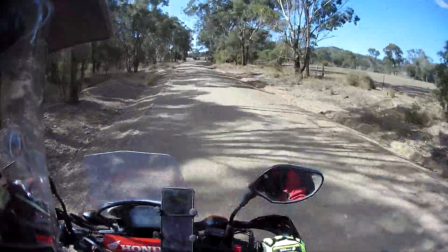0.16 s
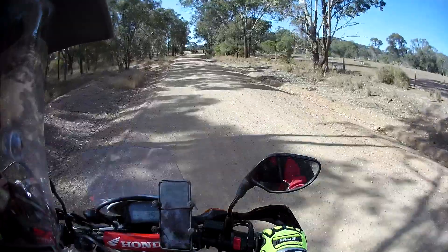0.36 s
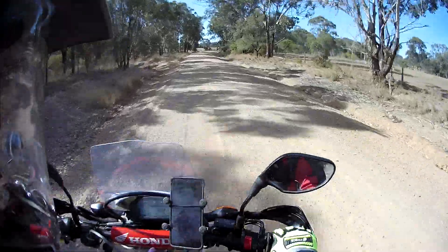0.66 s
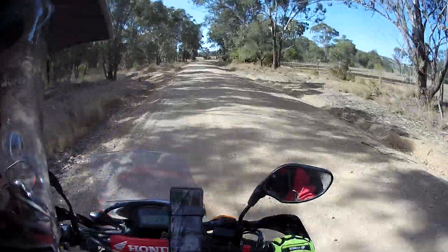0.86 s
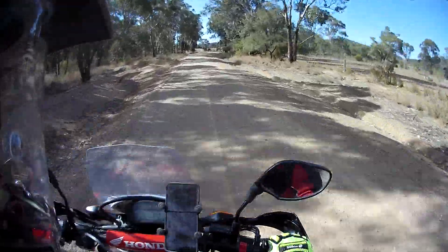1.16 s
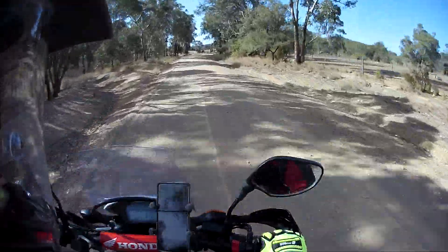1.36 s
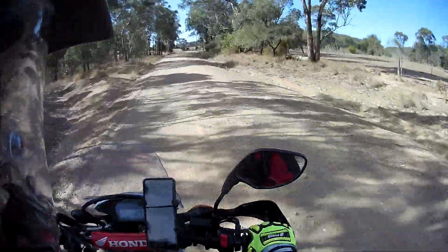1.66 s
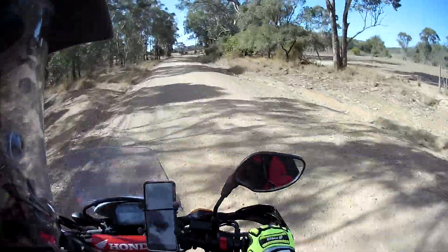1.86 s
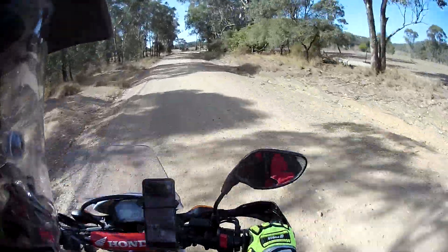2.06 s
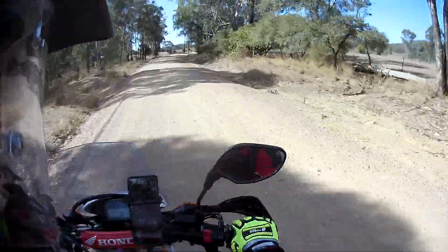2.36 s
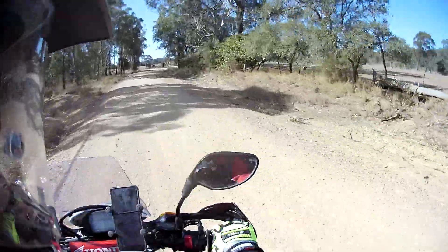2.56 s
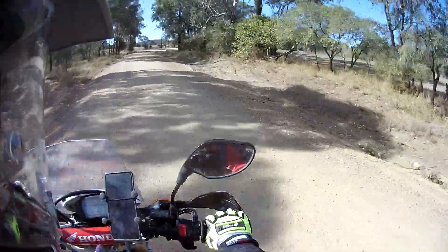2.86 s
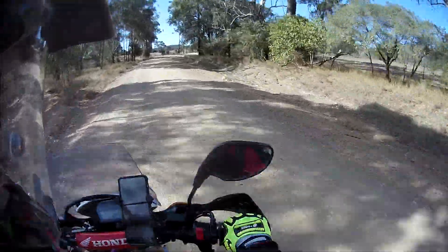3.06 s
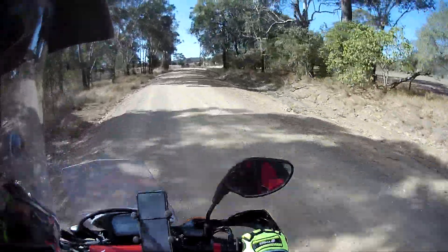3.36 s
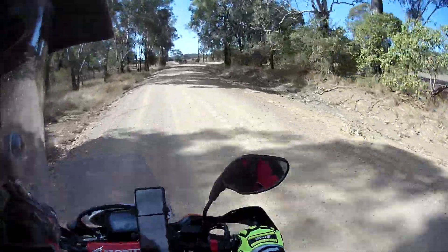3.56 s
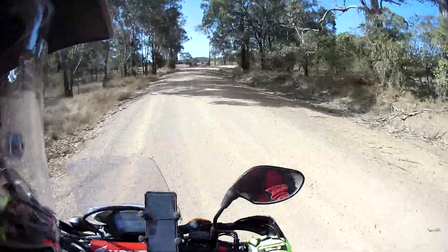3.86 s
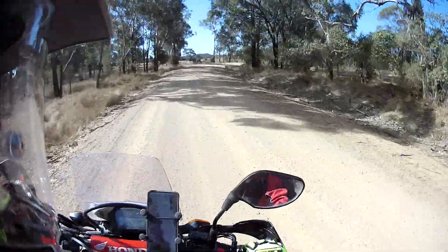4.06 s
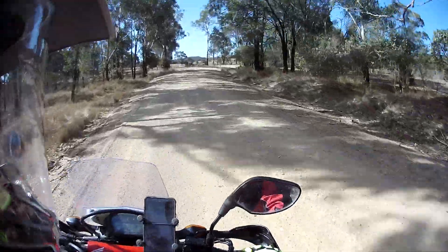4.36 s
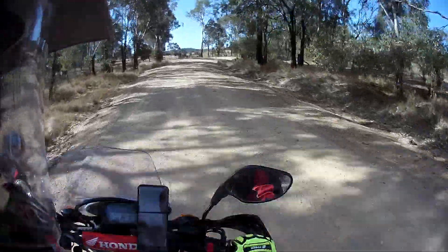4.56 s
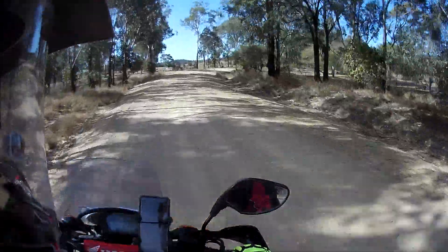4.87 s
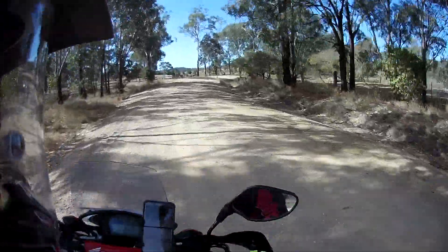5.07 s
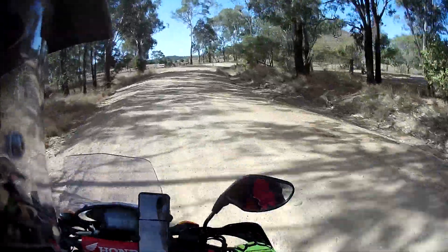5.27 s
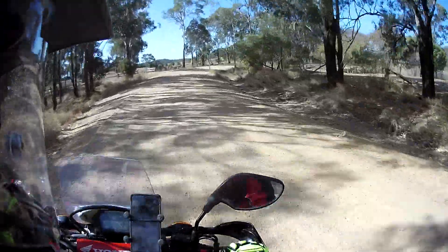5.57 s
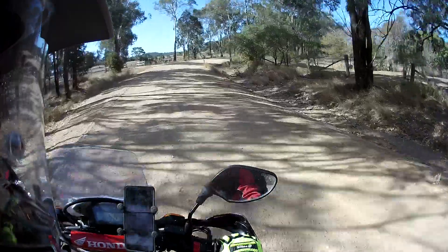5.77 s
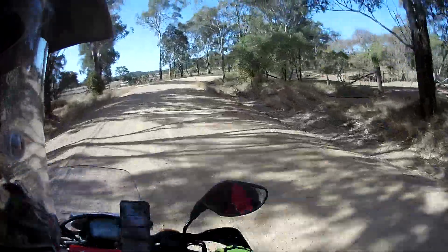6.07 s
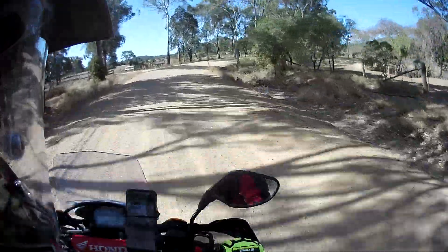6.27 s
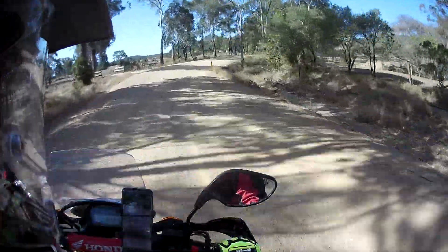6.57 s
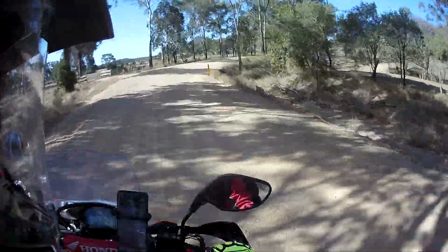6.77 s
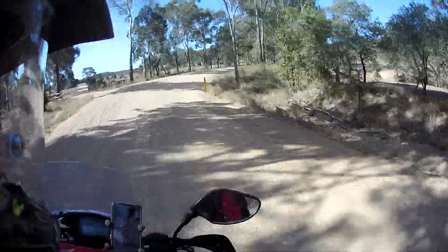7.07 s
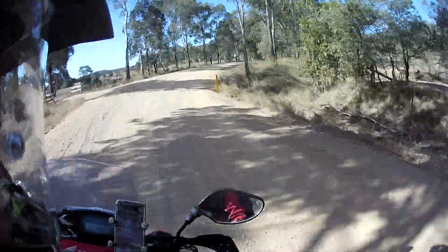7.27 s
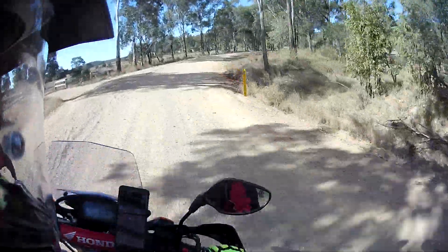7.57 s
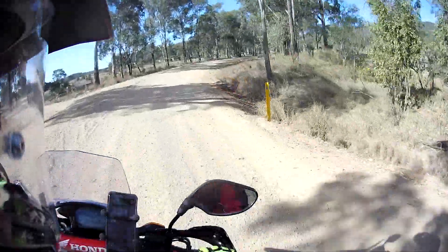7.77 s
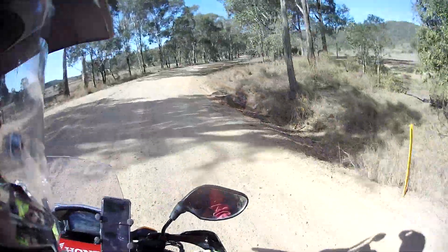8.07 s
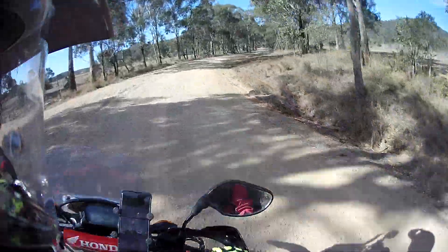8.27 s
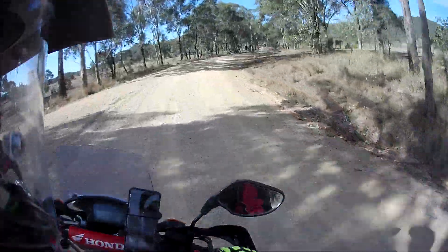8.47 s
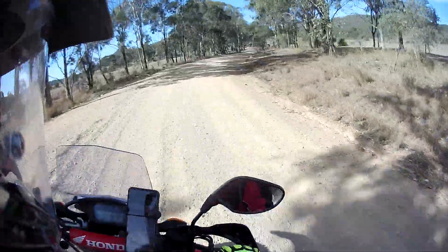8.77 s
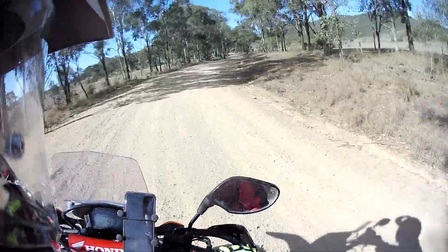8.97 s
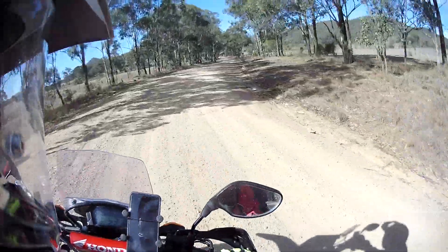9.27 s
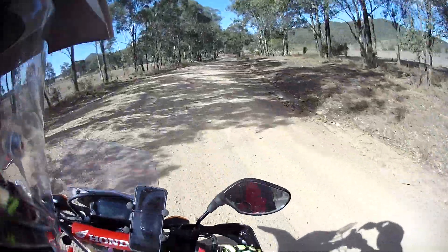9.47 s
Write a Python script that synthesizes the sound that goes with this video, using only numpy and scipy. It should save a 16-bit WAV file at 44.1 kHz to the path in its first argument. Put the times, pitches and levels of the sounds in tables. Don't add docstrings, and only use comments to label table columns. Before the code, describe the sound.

Close helmet microphone on a single-cylinder motorcycle riding an open gravel road. A low, pulsing exhaust throb and humming frame mix with lumpy wind buffeting, tyre roar and fine grit clicks. Deep jolts thump the microphone in the first second or so, then the engine gradually slows with brief throttle dabs. A small stone ticks sharply near six seconds, and the engine finally pulls steadily at a lower pitch.

```python
import sys
import numpy as np
from scipy import signal
from scipy.io import wavfile
from scipy.ndimage import uniform_filter1d

SR = 44100
rng = np.random.default_rng(int(sys.argv[2]) if len(sys.argv) > 2 else 0)


def waveform_to_disk(signal):
    frames = np.transpose(np.atleast_2d(signal))
    scaled = np.clip(frames, -1, 1) * 32767
    samples = np.round(scaled).astype(np.int16)
    wavfile.write(sys.argv[1], SR, samples)


def undo_db(level):
    steps = np.asarray(level, float) / 20
    return 10 ** steps


N = 425124


def evened(x):
    return x / np.sqrt(np.mean(x ** 2) + 1e-20)


def steady(x, size=4000):
    power = uniform_filter1d(uniform_filter1d(x ** 2, size), size)
    return x / np.sqrt(abs(power) + 1e-20)


def soften(x, hz):
    r = np.exp(-2 * np.pi * hz / SR)
    return signal.lfilter([1 - r], [1, -r], x)


def resonate(x, hz, width):
    r = np.exp(-np.pi * width / SR)
    if np.ndim(hz) == 0:
        return 2 * signal.lfilter([1 - r], [1, -r * np.exp(2j * np.pi * hz / SR)], x).real
    turn = np.exp(2j * np.pi * np.cumsum(hz) / SR)
    smooth = signal.lfilter([1 - r], [1, -r], x / turn + 1e-18)
    return 2 * (turn * smooth).real


def noise(spectrum, patchy_db, flicker_db, size=1024):
    frames, hz = 4 * N // size + 5, np.fft.rfftfreq(size, 1 / SR)
    a, b, patches = rng.standard_normal((frames, len(hz), 3)).T
    patches = uniform_filter1d(patches, size=size // 100, axis=0)
    patches = evened(uniform_filter1d(patches, size=6, axis=1))
    flicker = evened(uniform_filter1d(rng.standard_normal(frames), size=3))
    f, db = np.transpose(spectrum)
    shape_db = np.interp(np.log(hz + 1), np.log(f + 1), db, -120, -120)[:, None]
    z = (a + 1j * b) * undo_db(shape_db + patchy_db * patches + flicker_db * flicker)
    return evened(signal.istft(z, nperseg=size, noverlap=size * 3 // 4)[1][:N])


def curves(rows):
    s, *columns = np.transpose(rows)
    return [np.interp(np.arange(N) / SR, s, c) for c in columns]


# (time [s], rate [firings per s])
ENGINE_SPEED = [(0.0, 42.373), (0.41, 43.529), (1.25, 41.024), (2.15, 39.077), (2.3, 40.293), (2.5, 39.133),
                (3.68, 37.491), (3.84, 35.443), (4.0, 35.985), (4.8, 35.657), (5.05, 34.261), (5.7, 32.979),
                (5.88, 34.112), (6.25, 31.031), (6.9, 31.329), (7.5, 30.915), (8.6, 30.977), (9.64, 31.518)]


def firing_rate():
    return curves(ENGINE_SPEED)[0]


def over_cruise():
    return firing_rate() - 36


def crank():
    return .91 + np.cumsum(firing_rate()) / SR


# (time [s], throttle [0-1], pipe ring level [dB], pipe pitch [Hz])
THROTTLE_AND_PIPE = [(0, 0.3, -32.5, 259), (.45, 0.4, -35.5, 253.7), (1.5, 0.3, -35.5, 221),
                     (2.12, 0, -46.5, 232.7), (2.32, .7, -34.5, 257.4), (2.6, 0, -33, 224.4),
                     (3.62, .6, -36, 220.3), (3.85, 0.1, -35.5, 215), (4.1, .15, -35.5, 213.4),
                     (4.55, .05, -45, 213.5), (4.8, .5, -38.5, 278), (5.1, 0.4, -42.5, 204.7),
                     (5.65, 0, -51, 200), (5.9, .5, -34, 240.3), (6.2, 0.1, -43.5, 190),
                     (7, .05, -41.5, 198.6), (7.3, 0.63, -36, 270.2), (9.64, 0.96, -34, 269.4)]


def throttle_and_pipe():
    return curves(THROTTLE_AND_PIPE)


def between(ends):
    shut, wide_open = ends
    return shut + (wide_open - shut) * np.clip(throttle_and_pipe()[0], 0, 1)


def gas_pulses(turns):
    rough = between((.3, .06))
    early = turns + 0.2207
    whole = np.arange(np.ceil(early[0]), early[-1])
    size, lag = rng.standard_normal((len(whole), 2)).T
    at = np.searchsorted(early, whole)
    late = (.0012 * SR * rough[at] * lag).astype(int)
    pulses = np.zeros(N)
    pulses[np.clip(at + late, 0, N - 1)] = undo_db(8.4 * rough[at] * size)
    pulses = evened(soften(soften(pulses, 630), 630))
    puff = soften(rng.standard_normal(N), 800) * (.15 + np.exp(-(early % 1) / 0.14))
    return pulses + 0.36 * rough * evened(puff)


def pipe_ring(drive):
    _, ring_db, pipe_hz = throttle_and_pipe()
    narrow = np.clip((110 - between((74, 21))) / 70, 0, 1)
    wide = resonate(resonate(drive, pipe_hz, 180), pipe_hz, 140)
    long_ring = evened(resonate(wide, pipe_hz, 46))
    short_ring = evened(resonate(wide, pipe_hz, 160))
    return undo_db(ring_db) * steady(narrow * long_ring + (1 - narrow) * short_ring)


def silencer_thump(drive):
    hz = between((3.05, 4.4)) * firing_rate()
    db = between((-42, -47)) + 0.03 * over_cruise()
    return undo_db(db) * steady(resonate(resonate(drive, hz, 150), hz, 62))


# (pitch [Hz], width [Hz], level [dB])
AIR_BOX = [(576, 60, 5), (523, 80, 1.5), (710, 200, -3.5), (190, 67, 1)]


def air_box_knock(drive):
    late = np.roll(drive, round(.00182 * SR))
    knock = np.zeros(N)
    for hz, width, db in AIR_BOX:
        push = late if hz > 400 else drive
        knock += undo_db(db) * resonate(resonate(push, hz, min(4 * width, 500)), hz, width)
    return undo_db(between((-65.5, -45)) + 6) * steady(knock)


def exhaust(turns):
    drive = gas_pulses(turns)
    return silencer_thump(drive) + air_box_knock(drive) - pipe_ring(drive)


def loaded(rows):
    t, db = np.arange(N) / SR, np.full(N, -78.0)
    for row in rows:
        db[(t >= row[0]) & (t <= row[1])] = row[-1]
    return uniform_filter1d(db, round(.12 * SR))


def hum(firing, order):
    hz = order * firing_rate()
    return steady(resonate(resonate(firing, hz, 9), hz, 9))


# (start [s], end [s], level [dB])
LOW_HUM = [
    (0, 2.22, -38),
    (3.75, 4.3, -42),
    (5.15, 5.8, -38),
    (6.22, 6.75, -42),
]


def low_frame_hum(firing):
    return undo_db(loaded(LOW_HUM) - 5.5) * hum(firing, 3)


# (start [s], end [s], level [dB])
HIGH_HUM = [
    (0, 4.5, -53.5),
    (2.28, 2.6, -46.5),
    (3.9, 4.5, -38.5),
    (4.7, 6.1, -42),
    (6.25, 6.95, -49),
]


def high_frame_hum(firing):
    return undo_db(loaded(HIGH_HUM) - 10) * hum(firing, 6)


def meshing(rows):
    rows = np.array(rows)
    hz = np.interp(np.arange(N) / SR, rows[:, :2].ravel(), rows[:, 2:4].ravel())
    return hz, loaded(rows)


# (start [s], end [s], first pitch [Hz], last pitch [Hz], level [dB])
COAST_WHINE = [
    (0, .6, 2080, 2030, -57),
    (1.45, 2.2, 2120, 1980, -59.5),
    (2.3, 2.8, 2035, 2033, -57.5),
    (2.85, 3.7, 1914, 1903, -60.5),
    (3.9, 4.7, 1910, 1816, -58.5),
    (5.12, 6.08, 1784, 1698, -60),
    (6.2, 6.42, 1690, 1685, -61),
    (7.5, 9.64, 1642, 1678, -63),
]


def coasting_whine():
    hz, db = meshing(COAST_WHINE)
    whine = resonate(resonate(rng.standard_normal(N), hz, 80), hz, 30)
    return undo_db(db - 2.3) * steady(whine, size=6000)


# (start [s], end [s], first pitch [Hz], last pitch [Hz], level [dB])
PULL_WHINE = [
    (0, 1.5, 1456, 1490, -61.5),
    (2.3, 3.65, 1487, 1446, -59),
    (7.3, 9.64, 1500, 1514, -60.5),
]


def pulling_whine():
    hz, db = meshing(PULL_WHINE)
    return undo_db(db) * evened(resonate(resonate(rng.standard_normal(N), hz, 150), hz, 95))


# (start [s], end [s], level [dB])
SHAFT_TONE = [
    (0, .6, -61),
    (2.4, 3.78, -52),
]


def shaft_tone(turns):
    return undo_db(loaded(SHAFT_TONE)) * np.sqrt(2) * np.sin(2 * np.pi * 15 * turns)


def gears(turns):
    throb = 1 + 0.13 * np.cos(2 * np.pi * (turns - .3))
    return throb * (coasting_whine() + pulling_whine()) + shaft_tone(turns)


# (centre time [s], level over steady air [dB], half length [s])
SWELLS = [(.0, 6.5, 0.012), (0.375, 4.5, 0.068), (0.53, 9.5, 0.048), (0.68, 7, 0.053), (0.823, 9, 0.11),
          (0.991, 4, 0.06), (1.154, 3, 0.072), (1.251, 8, 0.06), (1.355, 5.5, 0.062), (1.522, 4, 0.037),
          (2.138, 4.5, 0.027), (2.28, 3.5, 0.027), (2.641, -1, 0.03), (3.106, 0, 0.046), (3.713, 3, 0.073),
          (3.592, 2.5, 0.068), (3.956, 2, 0.072), (4.258, 6.5, 0.044), (4.855, 2, 0.068), (5.163, 3, .06),
          (5.438, 3, 0.059), (5.677, 4.5, 0.23), (6.28, 3.5, 0.12), (6.88, 2, 0.035), (7.086, 2.5, 0.031),
          (7.376, 1, 0.046), (7.995, 3, 0.069), (8.296, 2.5, 0.091), (8.9, 2.5, 0.31), (9.586, 4.5, 0.096)]


def gusts():
    t = np.arange(0, N + 64, 64) / SR
    s, db, half = np.transpose(SWELLS)[:, :, None]
    swell_db = (db * np.exp(-((t - s) / half) ** 2)).sum(0)
    return np.interp(np.arange(N) / SR, t, swell_db)


def riding_level(db, per_rate, gust_share):
    return db + per_rate * over_cruise() + gust_share * gusts()


# (pitch [Hz], level [dB per Hz])
WIND_COLOUR = [(15, -5.5), (40, -2), (70, -3), (120, -1), (200, -8), (320, -14), (500, -24), (900, -55)]


def wind_buffet():
    db = riding_level(-44, 0.51, 1.21) + between((0, -6))
    wind = noise(WIND_COLOUR, patchy_db=3.3, flicker_db=0.4, size=2048)
    return undo_db(db + 5.5) * steady(wind, size=6000)


# (pitch [Hz], level [dB per Hz])
TYRE_COLOUR = [(88, -30), (150, -8), (200, -3.5), (280, -4), (330, -13), (620, -15.5), (1000, -24),
               (1540, -32), (2400, -44.5), (3100, -62), (5000, -110)]


def tyre_roar():
    db = riding_level(-43.5, 0.65, 0.85) + between((0, -2))
    return undo_db(db + 5) * noise(TYRE_COLOUR, patchy_db=1.24, flicker_db=1.39, size=512)


# (pitch [Hz], level [dB per Hz])
VALVE_COLOUR = [(760, -29.5), (1300, -3.5), (1500, -5), (1700, -6.5), (2000, -3.5), (2330, -17),
                (2700, -11.5), (3050, -19), (3400, -22), (3900, -27.5), (4400, -30.5), (4900, -38.5),
                (6500, -43), (9000, -54)]


def valve_fizz(turns):
    swell = 1 + 0.091 * np.cos(2 * np.pi * (turns - .15))
    fizz = noise(VALVE_COLOUR, patchy_db=0.9, flicker_db=0.0, size=512)
    return undo_db(riding_level(-66.5, 0.64, 0.43) + 9.5) * swell * fizz


def grit():
    chance, size = rng.random(N), np.minimum(rng.exponential(1, N), 4)
    clicks = (chance < 600 / SR) * undo_db(3 * size)
    band = signal.butter(3, (600, 2010), "bandpass", fs=SR, output="sos")
    clicks = signal.sosfilt(band, clicks)
    return undo_db(riding_level(-67, 1, 1.5)) * evened(soften(soften(clicks, 3000), 3000))


# (pitch [Hz], level [dB per Hz])
HISS_COLOUR = [(3000, -6.5), (5000, 4), (8000, -0.5), (10800, 0), (12600, -3.5), (13500, -6.5)]


def preamp_hiss():
    return undo_db(-89.5) * noise(HISS_COLOUR, patchy_db=-1.0, flicker_db=0.0, size=512)


# (time [s], peak level [dB], pitch [Hz], time to fade 60 dB [s])
RUT_JOLTS = [
    (.51, -27, 151, 0.13),
    (0.658, -19.5, 77.3, 0.43),
    (0.703, -27, 190, 0.12),
    (.83, -16.5, 68, 0.17),
    (1.212, -15, 111.5, 0.13),
    (1.262, -16, 129, 0.083),
    (4.232, -29.5, 141, .1),
    (5.419, -37, 437, 0.35),
]


def jolts():
    out, t = np.zeros(N), np.arange(SR // 5) / SR
    onset = 1 - np.exp(-t / 0.00057)
    for s, db, hz, t60 in RUT_JOLTS:
        swing = undo_db(db - 60 * t / t60) * np.sin(2 * np.pi * hz * t)
        out[round(s * SR):][:len(t)] += swing * onset
    return out


def card_twitter():
    hz, write_at = 10800, .69
    busy = np.exp(-((np.arange(N) / SR % 1 - write_at) / .035) ** 2)
    return undo_db(-89.5) * busy * evened(resonate(rng.standard_normal(N), hz, 900))


# (time [s], ring level [dB], crack level [dB])
STONE_HITS = [
    (5.8538, -33.5, -55),
]
# (pitch [Hz], level [dB], time to fade 60 dB [s])
HOUSING = [(1850, 4.5, 0.012), (2700, -15, .006), (3260, -8.5, 0.0094), (4040, -13, 0.0099),
           (5800, -26, .005)]


def stone():
    out, t = np.zeros(N), np.arange(400) / SR
    onset = 1 - np.exp(-t / 0.00034)
    for s, ring_db, crack_db in STONE_HITS:
        ring = np.zeros(len(t))
        for hz, db, t60 in HOUSING:
            ring += undo_db(ring_db + db - 60 * t / t60) * np.sin(2 * np.pi * hz * t)
        crack = undo_db(crack_db - 60 * t / 0.0073) * rng.standard_normal(len(t))
        out[round(s * SR):][:len(t)] += ring * onset + crack
    return out


def scene():
    turns = crank()
    firing = exhaust(turns)
    engine = firing + low_frame_hum(firing) + high_frame_hum(firing) + gears(turns)
    ride = wind_buffet() + tyre_roar() + valve_fizz(turns) + grit()
    return (engine + ride + jolts() + stone())[None]


def low_pass(x):
    return signal.sosfilt(signal.butter(12, 12750, fs=SR, output="sos"), x)


def record(dry):
    fade_out = np.minimum((N - np.arange(N)) / 256, 1)
    offset = -.0047
    mix = dry * fade_out + preamp_hiss() + card_twitter() + offset
    return low_pass(mix)


dry = scene()
out = record(dry)
waveform_to_disk(out)
```